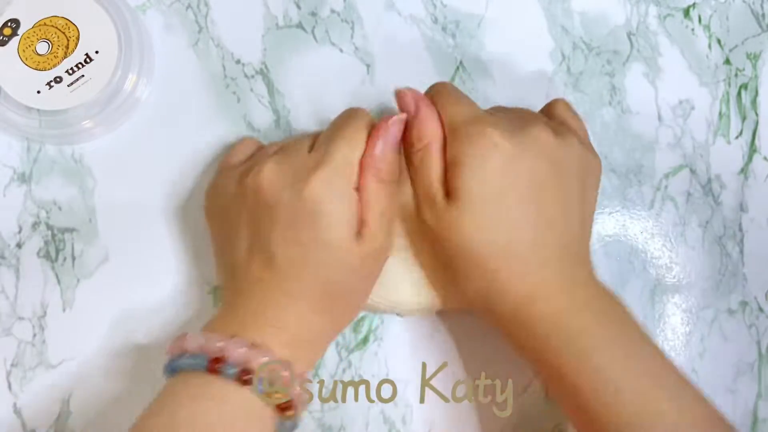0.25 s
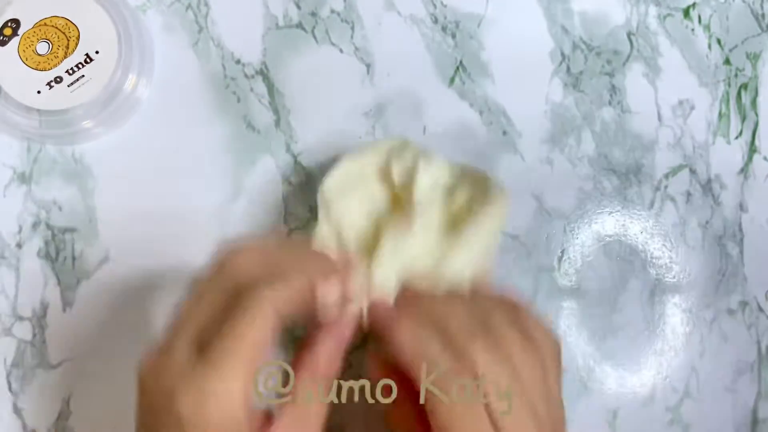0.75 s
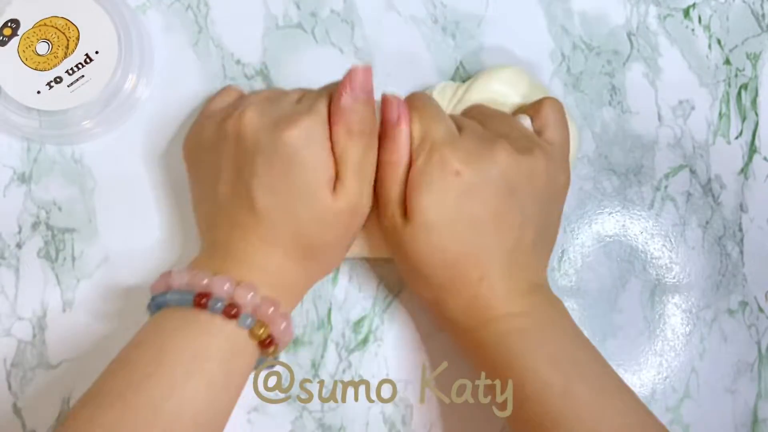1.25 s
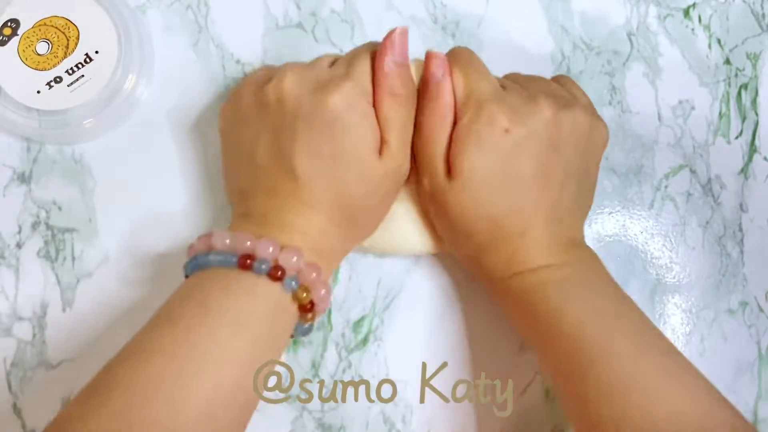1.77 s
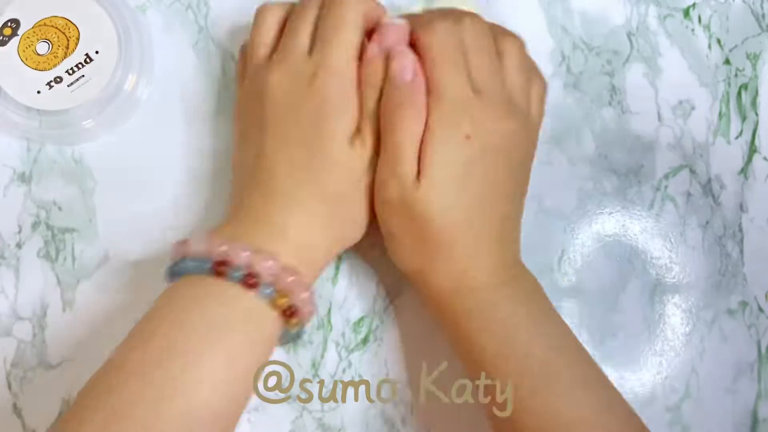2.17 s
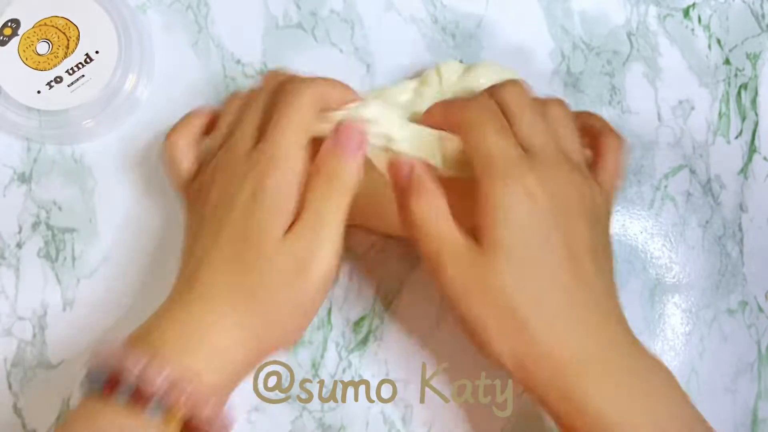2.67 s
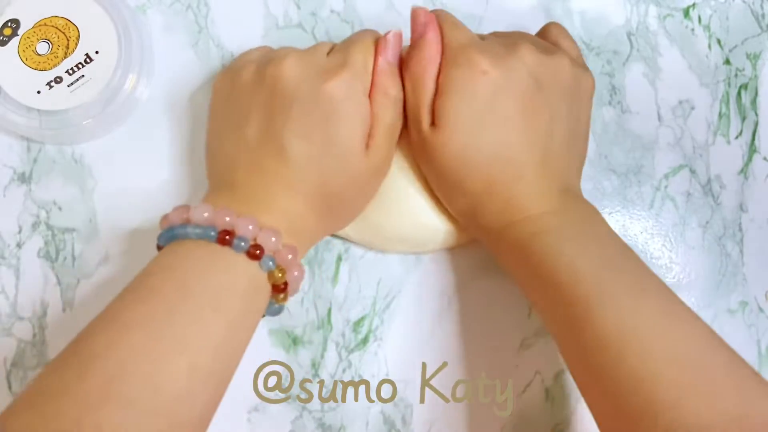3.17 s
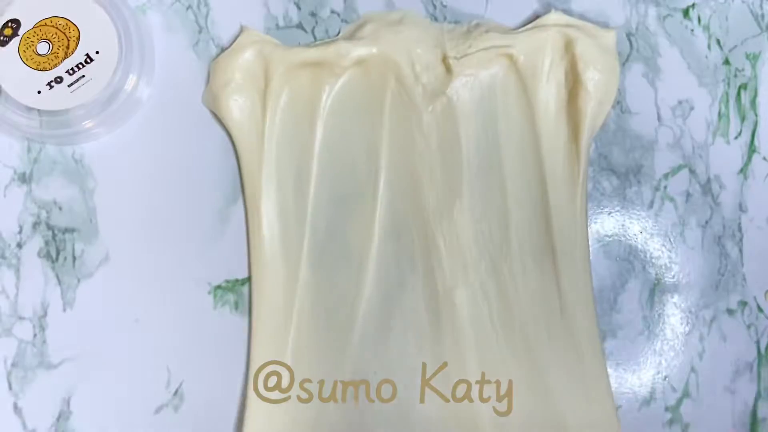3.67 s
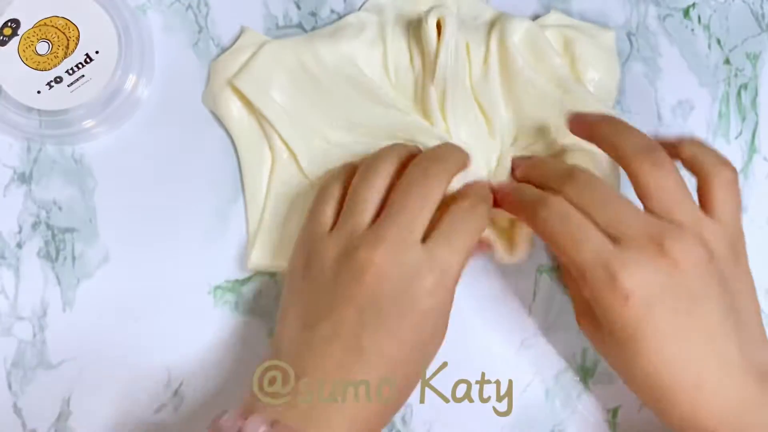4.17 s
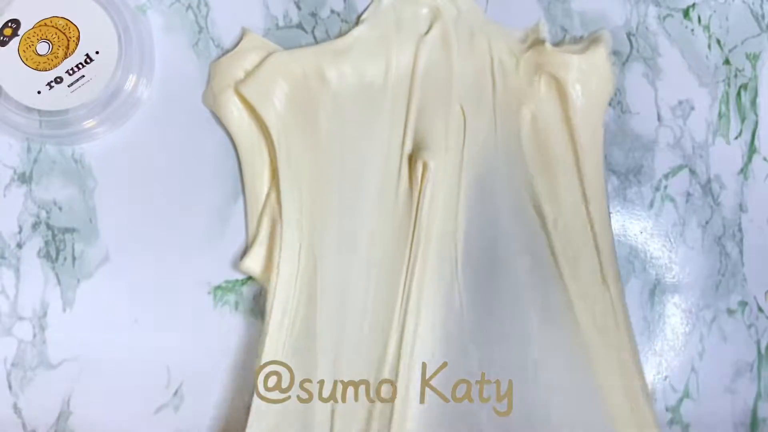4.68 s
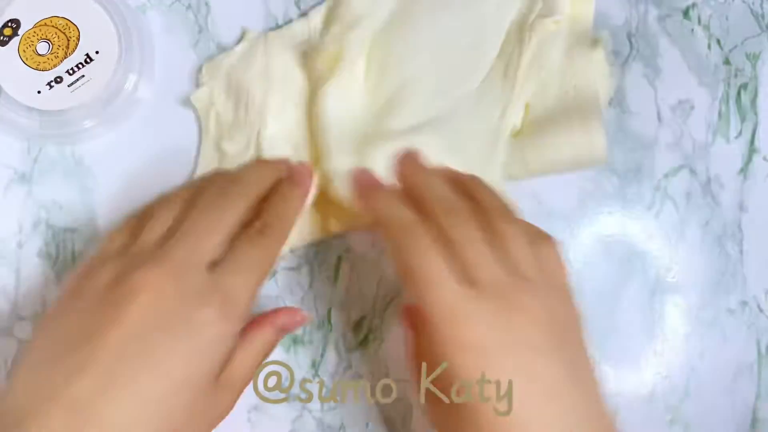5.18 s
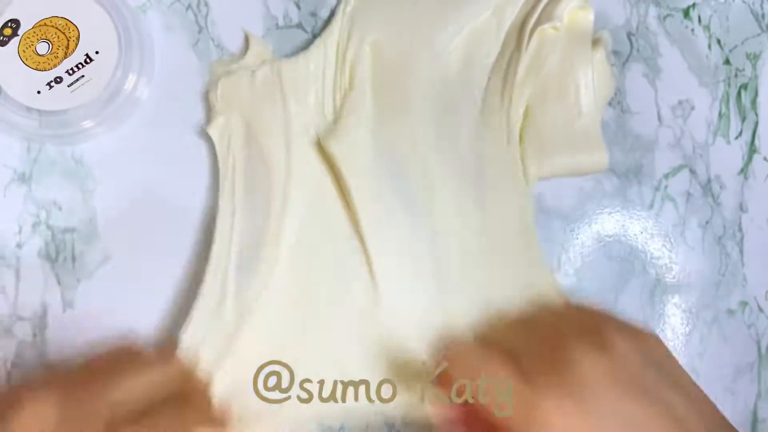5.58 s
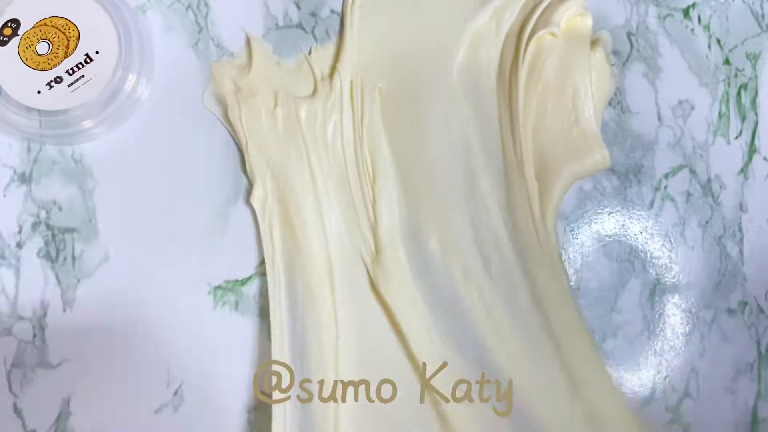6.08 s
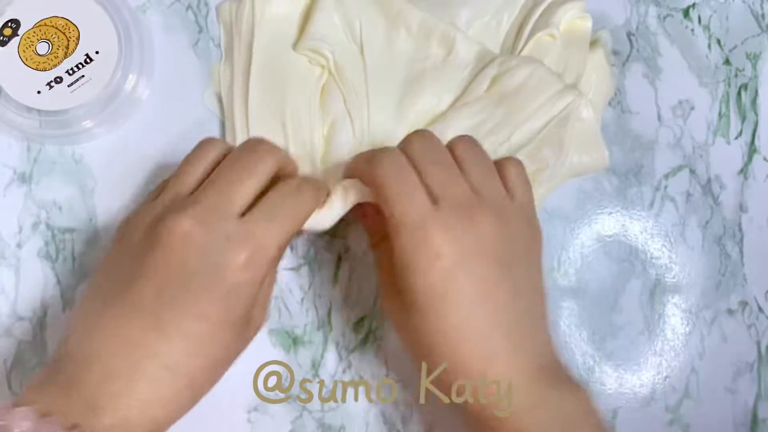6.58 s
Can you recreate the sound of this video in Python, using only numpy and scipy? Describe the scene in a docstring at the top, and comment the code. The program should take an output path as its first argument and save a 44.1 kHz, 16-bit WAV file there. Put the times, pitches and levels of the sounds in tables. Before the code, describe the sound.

Two hands knead sticky slime on a table, close to the microphone in a small, quiet room. Trapped air bursts in ragged clusters of sharp pops, with dull thuds and a fine crackling hiss as the slime peels off skin and tabletop. About halfway through it gets quieter: the slime is stretched and folded, giving scattered crackles, faint squeaks and a few soft slaps over a low table rumble.

```python
"""A table in a small room, close under a pair of microphone ports: two hands knead, fold and
stretch sticky slime. Trapped air pockets burst in short ragged pops; lump and hands thud on the
table top and ring its modes. The slime peels off skin and table with a fine crackling hiss and
the stretched sheet squeaks faintly, over table rumble, deep sway and room tone."""
import sys
import numpy as np
from scipy import signal
from scipy.fft import rfft, irfft
from scipy.io import wavfile
from scipy.ndimage import uniform_filter1d

SR = 44100
rng = np.random.default_rng(int(sys.argv[2]) if len(sys.argv) > 2 else 0)


def digitize_waveform(pressure):
    """Quantize a signal to 16-bit integers and store it at the path in sys.argv[1].

    Rows of a 2-D input are taken as channels; values are limited to [-1, 1].
    """
    field = np.atleast_2d(pressure).T
    bounded = np.clip(field, -1, 1)
    quanta = np.round(bounded * 32767).astype(np.int16)
    wavfile.write(sys.argv[1], SR, quanta)


N = 301644


def from_db(db):
    """Level to gain."""
    return 10 ** (np.asarray(db) / 20)


def unit_rms(x):
    """Scale to rms 1."""
    return x / np.sqrt(np.mean(x ** 2) + 1e-20)


def butter(x, order, hz, kind="band"):
    """Butterworth filter."""
    return signal.sosfilt(signal.butter(order, hz, kind, fs=SR, output="sos"), x)


def in_time(rows):
    """Columns of a curve table, one value per sample."""
    times, *columns = np.transpose(rows)
    return [np.interp(np.arange(N) / SR, times, column) for column in columns]


def at_hz(spectrum, hz):
    """Read a spectrum table on a log-frequency axis."""
    table_hz, values = np.transpose(spectrum)
    return np.interp(np.log(hz), np.log(table_hz), values)


def drift(rate_hz):
    """Slow random curve, rms 1."""
    pole = np.exp(-80 * np.pi * rate_hz / SR)  # runs at SR / 40
    slow = signal.lfilter([1], [1, -2 * pole, pole * pole], rng.standard_normal(N // 40 + 2002))[2000:]
    return np.interp(np.arange(N) / 40, np.arange(len(slow)), unit_rms(slow))


def add(out, sound, s):
    """Mix a sound in at s seconds."""
    i = round(s * SR)
    out[..., i:i + sound.shape[-1]] += sound[..., :N - i]


# Left-right likeness of noise: f/Hz, correlation
COHERENCE = [(30, 1), (100, 0.9), (400, 0.72), (1000, 0.95), (4000, 0.047), (8000, 1), (16000, 1)]


def coloured(source, spectrum):
    """Mid and side source to left and right with the given spectrum, rms 1."""
    hz = np.maximum(np.fft.rfftfreq(N, 1 / SR), 1)
    alike = np.clip(at_hz(COHERENCE, hz), 0, 1)
    mid, side = rfft(source) * from_db(at_hz(spectrum, hz))
    return unit_rms(irfft(np.sqrt(1 + alike) * mid + np.sqrt(1 - alike) * side * [[1], [-1]], N))


# Room tone: f/Hz, density/dB
AIR_SPECTRUM = [(30, 4.5), (60, 11.5), (120, 6), (500, -13), (2000, -12), (7000, -20.5), (16000, -25.5)]


def room_tone(level_db=-75.5):
    """Steady, bass-heavy noise."""
    return from_db(level_db) * coloured(rng.standard_normal((2, N)), AIR_SPECTRUM)


# Colour of the reverberant tail: f/Hz, density/dB
TAIL_SPECTRUM = [(100, -4.5), (300, 1), (1000, -8.5), (4000, -2), (16000, -17)]
# Reflections off table top and near surfaces: delay/ms, level/dB
REFLECTIONS = [(1.9, -14.5), (4.0, -21)]


def room(x, tail_db=-19, t60_s=0.2, treble_t60_s=0.12, treble_hz=5600):
    """Near reflections, then a dense stereo tail whose treble dies first."""
    t, length = np.arange(N) / SR, SR // 2
    envelope = from_db(-60 * t / t60_s) * (1 - np.exp(-t / 0.0045))
    tail = coloured(rng.standard_normal((2, N)) * envelope, TAIL_SPECTRUM)[:, :length]
    low = butter(tail, 2, treble_hz, "low")
    tail = low + (tail - low) * from_db(60 * t[:length] * (1 / t60_s - 1 / treble_t60_s))
    response = from_db(tail_db) * tail / np.sqrt(np.sum(tail ** 2) / 2)
    response[:, 0] += 1
    for ms, db in REFLECTIONS:
        response[:, round(ms * SR / 1000)] += from_db(db)
    return signal.fftconvolve(x, response, axes=1)[:, :N]


# Deep bass of the swaying table: t/s, level/dB
SWAY_LEVEL = [(0.0, -76.5), (0.59, -74), (0.89, -69.5), (4.27, -71.5), (4.74, -76), (5.39, -70.5),
              (5.7, -75.5), (6.17, -69), (6.84, -85.5)]


def table_sway(band_hz=(39.5, 110), lumpy_db=3.5):
    """The table sways as arms lean and pull: deep, lumpy bass."""
    level_db = in_time(SWAY_LEVEL)[0] + lumpy_db * drift(rate_hz=6.7)
    return from_db(level_db) * unit_rms(butter(rng.standard_normal(N), 2, band_hz))


# Slime settling between moves: t/s, hiss/dB, rumble/dB
REST_LEVELS = [(0, -94, -47), (.4, -73, -59), (.47, -80, -70.5), (.53, -73.5, -66.5), (.8, -69, -64.5),
               (1.45, -66.5, -74.5), (2.1, -76, -68), (2.21, -74, -79), (2.23, -63.5, -60.5),
               (2.55, -76, -66.5), (2.76, -80, -65), (3.1, -67, -60.5), (3.6, -77.5, -69),
               (4.2, -68.5, -68), (4.6, -71.5, -71.5), (4.83, -75, -72), (5.1, -69, -67),
               (5.35, -71.5, -71.5), (5.75, -72.5, -73), (5.85, -73, -73), (5.95, -76.5, -70.5),
               (6.05, -68.5, -68), (6.84, -72.5, -71)]
# Slow pushes and pulls: peak/s, release/s, hiss/dB, treble re hiss/dB, rumble/dB
SLOW_STROKES = [(0.315, 0.383, -48, 1.5, -43.5), (1.374, 1.424, -48.5, 7, -44.5),
                (2.014, 2.118, -49, 5, -47), (2.663, 2.73, -56.5, -4, -50), (2.667, 2.73, -49, 3, -47),
                (2.724, 2.729, -53.5, -7, -46), (3.318, 3.418, -51.5, 6, -44.5),
                (3.485, 3.509, -66.5, -11.5, -74.5), (3.803, 3.93, -66.5, 7, -61.5),
                (4.53, 4.705, -75.5, -3, -68), (4.986, 5.137, -63, 8, -66.5),
                (5.479, 5.703, -57.5, -1, -60), (6.195, 6.337, -63.5, -15, -61.5),
                (6.64, 6.796, -55.5, -5, -63)]
# Sudden peels: t/s, hold/s, hiss/dB, treble re hiss/dB, rumble/dB
SUDDEN_PEELS = [(0, 0.1, -41.5, 5, -55), (0.56, 0.098, -59.5, 7, -57), (0.879, 0.025, -58, -13, -62),
                (1.027, 0.08, -44, 5, -47.5), (1.576, 0.11, -58, -12, -53), (1.799, 0.0057, -48.5, 20, -65),
                (2.296, 0.011, -49.5, -0.5, -50), (2.369, 0.011, -51, 16.5, -56),
                (2.773, 0.011, -60.5, -23, -59), (2.833, 0.0089, -53.5, -10.5, -52),
                (2.954, 0.022, -57, -5, -51.5), (3.03, 0.017, -51.5, -4, -53), (3.111, 0.011, -56, -9, -53),
                (3.969, 0.0093, -52, -22.5, -53), (4.251, 0.043, -67, 13.5, -69.5),
                (4.358, 0.024, -84, -0.5, -71), (5.173, 0.031, -51, -23.5, -53),
                (5.236, .01, -61.5, -11.5, -69), (6.359, 0.0064, -50.5, -23, -55.5),
                (6.455, 0.0053, -55, -17, -58)]
BUILD_DB_PER_S, EASE_DB_PER_S, RELEASE_DB_PER_S = 132, 159.5, 1800
ONSET_DB_PER_S, FADE_DB_PER_S = 603.5, 201.5


def handling_levels(rest_treble_db=-5):
    """Hiss, treble and rumble in dB: each stroke and peel adds its power to the rest level."""
    t = np.arange(N) / SR
    rest_db, rest_rumble_db = in_time(REST_LEVELS)
    power = from_db([rest_db, rest_db + rest_treble_db, rest_rumble_db]) ** 2
    moves = []
    for peak_s, release_s, *levels in SLOW_STROKES:
        shape_db = np.minimum(BUILD_DB_PER_S * (t - peak_s), EASE_DB_PER_S * (peak_s - t))
        moves.append((shape_db - RELEASE_DB_PER_S * np.maximum(t - release_s, 0), *levels))
    for s, hold_s, *levels in SUDDEN_PEELS:
        shape_db = np.minimum(ONSET_DB_PER_S * (t - s), FADE_DB_PER_S * (s + hold_s - t))
        moves.append((np.minimum(0, shape_db), *levels))
    for shape_db, hiss_db, tilt_db, rumble_db in moves:
        power += from_db([[hiss_db], [hiss_db + tilt_db], [rumble_db]]) ** 2 * 10 ** (shape_db / 10)
    return 10 * np.log10(power)


# Table-top modes, also rung by thuds: f/Hz, level/dB, T60/s
TABLE_MODES = [(93, -17.5, 0.21), (147, -9, 0.24), (160, -6, .1), (283, -15.5, 0.096), (475, -10, 0.042),
               (550, -21.5, 0.19)]
# Handling noise in the table: f/Hz, density/dB
RUMBLE_SPECTRUM = [(30, -21), (60, -7.5), (90, -1), (150, -9.5), (300, 1.5), (500, -2.5), (800, -17)]


def table_rumble(level_db, ring_db=11.5, bandwidth_hz=9.7):
    """The peeling motion rumbles in the table; its modes stand out of the noise."""
    drive = rng.standard_normal((2, N)) * from_db(3.6 * drift(rate_hz=14))
    rumble = coloured(drive, RUMBLE_SPECTRUM)
    for hz, db, _ in TABLE_MODES:
        ring = signal.lfilter(*signal.iirpeak(hz, hz / bandwidth_hz, SR), rumble)
        rumble = rumble + from_db(db + ring_db) * ring
    return from_db(level_db) * unit_rms(rumble)


def flicker(x, depth_db=3, rate_hz=21):
    """Each sixth of an octave, 0.5-16 kHz, swells and fades by itself; rms 1."""
    edges_hz = 500 * 2 ** np.arange(0, 5.1, 1 / 6)
    bands = (butter(x, 2, band_hz) * (-1) ** k for k, band_hz in enumerate(zip(edges_hz, edges_hz[1:])))
    return unit_rms(sum(band * from_db(depth_db * drift(rate_hz)) for band in bands))


# Peeling hiss: f/Hz, density/dB
HISS_SPECTRUM = [(500, -1), (1100, 1), (2000, -1.5), (4000, -6.5), (7000, -10), (11000, -13.5),
                 (16000, -29.5)]


def peeling(hiss_db, treble_db, snaps_per_s=1600, spread_db=3.5, clump_db=2.5, treble_hz=6000):
    """Countless tiny threads snap, in clumps, over a smooth rub."""
    sizes = from_db(spread_db * np.minimum(rng.exponential(1, N), 5))
    snapping = rng.random(N) < snaps_per_s / SR
    snaps = unit_rms(sizes * snapping) * rng.standard_normal((2, N))
    rub = 0.85 * rng.standard_normal((2, N))
    clumps = from_db(clump_db * drift(rate_hz=22))
    hiss = flicker(coloured((snaps + rub) * clumps, HISS_SPECTRUM))
    low = butter(hiss, 1, treble_hz, "low")
    return from_db(hiss_db) * low + from_db(treble_db) * (hiss - low)


# Squeaks of the stretched sheet: t/s, level/dB, f/Hz, length/ms
SHEET_SQUEAKS = [(2.16, -65, 1384, 35), (3.266, -61, 3050, 41), (3.265, -56.5, 2070, 48),
                 (3.28, -55, 882, 44), (3.325, -50.5, 1153, 35), (3.4, -64, 1114, 75),
                 (3.47, -69, 1937, 50), (3.55, -73, 1696, 71), (4.18, -65, 3260, 70),
                 (4.565, -66, 1420, 25), (4.67, -69, 1400, 18.5), (4.732, -69.5, 1382, 26),
                 (4.84, -71, 3150, 78), (4.865, -69.5, 1343, 20), (4.88, -69, 2710, 38),
                 (5.012, -64.5, 704, 22), (5.16, -43.5, 857, 13), (5.164, -50, 2670, 11),
                 (5.2, -54, 1070, 22), (5.405, -65.5, 900, 15), (5.502, -63, 1460, 35),
                 (5.555, -62.5, 1176, 47), (5.634, -66.5, 2970, 23), (5.639, -65.5, 1300, 32),
                 (5.642, -66, 3930, 42), (5.86, -74.5, 1690, 30), (5.886, -73.5, 1390, 19),
                 (5.989, -60.5, 1358, 35), (6.049, -63, 1334, 31), (6.054, -69, 1994, 31),
                 (6.15, -66.5, 3800, 28), (6.17, -62, 1905, 43), (6.2, -70, 3720, 28),
                 (6.211, -67.5, 3030, 48), (6.475, -61, 1000, 41), (6.5, -63, 2400, 32),
                 (6.536, -69, 2700, 27), (6.667, -59, 2210, 10), (6.794, -69.5, 3590, 35)]


def squeaks(hiss_db, waver=0.022, rough_db=5, stray_db=-5, stray_count=450):
    """The sheet squeaks in short, rough, wavering tones; faint random ones follow the hiss level."""
    out, strays = np.zeros(N), []
    for when, softness, pitch, length in rng.random((stray_count, 4)):
        s = 6.7 * when
        db = hiss_db[round(s * SR):][:2000].min() + stray_db - 8 * softness
        strays.append((s, db, 900 * 3.8 ** pitch, 15 + 60 * length))
    for s, db, hz, ms in SHEET_SQUEAKS + strays:
        n = round(ms * SR / 1000)
        wobble = unit_rms(uniform_filter1d(rng.standard_normal(6000), 90)[:n])
        grit = unit_rms(uniform_filter1d(rng.standard_normal(6000), 60)[:n])
        tone = np.sin(2 * np.pi * np.cumsum(hz * (1 + waver * wobble)) / SR)
        add(out, from_db(db + rough_db * grit) * np.hanning(n) ** 0.88 * tone, s)
    return out


# A hand presses or lands on the table: t/s, level/dB, final f/Hz
HAND_THUDS = [(0.01, -34, 473), (0.031, -24, 480), (0.041, -34, 270), (0.095, -23, 465), (.104, -34.5, 284),
              (0.158, -36.5, 318), (0.324, -36.5, 370), (0.771, -57, 152), (.901, -48, 383),
              (1.011, -30.5, 456), (1.02, -38, 285), (1.031, -38, 249), (1.039, -33.5, 740),
              (1.05, -44, 504), (1.068, -48, 467), (1.104, -34.5, 462.6), (1.129, -35.5, 430),
              (1.138, -46, 490), (1.15, -47, 282), (1.371, -44.5, 89.5), (1.526, -29.5, 296),
              (1.652, -34, 482), (1.707, -42, 513), (1.791, -31, 286), (1.792, -32, 620), (1.794, -51, 156),
              (1.944, -51.5, 305), (2.02, -48, 93), (2.048, -47.5, 520), (2.24, -57.5, 150),
              (2.284, -39.5, 425), (2.298, -32.5, 292), (2.342, -30.5, 403), (2.355, -29, 520),
              (2.367, -24.5, 445), (2.41, -36.5, 480), (2.442, -47, 382), (2.669, -38.5, 350),
              (2.837, -23.5, 300), (3.037, -44.5, 450), (3.119, -34, 311), (3.297, -40.5, 268),
              (3.341, -36, 280), (3.721, -58.5, 139.3), (3.979, -55, 152), (4.142, -52.5, 150),
              (4.283, -57, 158), (4.349, -61, 60.8), (4.429, -56, 60), (4.445, -62.5, 98.6),
              (5.172, -51, 157), (5.446, -47, 147), (5.49, -49, 121.6), (6.351, -47, 248),
              (6.383, -45.5, 97), (6.433, -49, 92), (6.51, -60.5, 150), (6.583, -61, 295),
              (6.621, -57.5, 156), (6.691, -71, 88.8)]
# The folded sheet lands: t/s, level/dB
SHEET_SLAPS = [(4.049, -30.5), (5.2501, -28.5), (6.379, -41.5), (6.455, -38.5)]
THUD_SHAPE, SLAP_SHAPE = (1.273, 0.88), (1.76, 1.15)  # start f / final f, swell/cycles
SLAP_HZ = 155.7
SMACK_HZ, SMACK_DB, SMACK_LEAD_S = 356, -3, 0.0039  # the wet face smacks just ahead of each slap


def thuds(sag_s=0.0029, reach_octaves=0.57):
    """A soft blow swells and dies in a few cycles, high waves first; nearby table modes ring on."""
    out, t = np.zeros(N), np.arange(9000) / SR
    mode_hz, mode_db, t60_s = np.transpose(TABLE_MODES)[:, :, None]
    blows = [(s, db, hz, THUD_SHAPE) for s, db, hz in HAND_THUDS]
    blows += [(s, db, SLAP_HZ, SLAP_SHAPE) for s, db in SHEET_SLAPS]
    blows += [(s - SMACK_LEAD_S, db + SMACK_DB, SMACK_HZ, THUD_SHAPE) for s, db in SHEET_SLAPS]
    for s, db, hz, (start_ratio, cycles) in blows:
        swell_s = cycles / hz
        pitch_hz = hz * (1 + (start_ratio - 1) * np.exp(-t / sag_s))
        blow = t / swell_s * np.exp(1 - t / swell_s) * np.sin(2 * np.pi * np.cumsum(pitch_hz) / SR)
        coupling = np.exp(-0.5 * (np.log2(mode_hz / hz) / reach_octaves) ** 2)
        decay = from_db(mode_db + 2 * rng.standard_normal(mode_hz.shape) - 60 * t / t60_s)
        ring = np.sum(coupling * decay * np.sin(2 * np.pi * mode_hz * t), axis=0)
        add(out, from_db(db) * (blow + ring * (1 - np.exp(-t / swell_s))), s)
    return out


def tear_envelope(t, ms, snap_s=0.0003, shrink_db=-28, shrink_t60_s=0.2):
    """A film snaps (less in long tears), rips, stops short, then crackles faintly as it shrinks back."""
    progress = 1000 * t / ms
    snap = from_db(-4.5 - ms) * t / snap_s * np.exp(1 - t / snap_s)
    rip = (1 - np.exp(-progress / 0.6)) * np.exp(-(0.6 * progress) ** 2)
    shrink = np.sqrt(ms) * (1 - np.exp(-t / 0.0026)) * from_db(shrink_db - 60 * t / shrink_t60_s)
    return snap + rip + shrink


# Bursting air pockets: t/s, pocket/dB, pocket f/Hz, film/dB, wall slap/dB, tear/ms
AIR_POCKETS = [(0.0112, -11, 5500, -23, -46, 1.5), (0.0265, -19, 6030, -26, -30, 4.3),
               (0.0305, -6.5, 6100, -21, -13.5, 2.4), (0.0477, -17, 5670, -11.5, -49, 3),
               (0.0576, -0.5, 8000, -25, -43, 1.4), (0.075, -6, 6550, -9, -42, 0.9),
               (0.084, -11.5, 5430, -16, -49, 2.5), (0.096, -9, 3000, -2, -23, 1.2),
               (.1073, -22, 3780, -34, -36, 1.6), (0.121, -28, 4500, -43, -33, 1.8),
               (0.154, -65, 3380, -33, -33, 2.3), (0.272, -32, 6500, -43.5, -50, 1.2),
               (0.286, -38, 4020, -57, -37, 1.1), (.56, -48, 5040, -52, -41.5, 0.8),
               (0.5842, -36.5, 3870, -61, -43, 0.81), (.614, -41, 4000, -57, -60, 2.5),
               (0.638, -32, 3400, -37, -62, 0.51), (0.703, -41.5, 3200, -54, -58, 1.3),
               (0.9002, -23, 3170, -32, -37, 1.9), (.948, -45, 5500, -46, -49, 1.5),
               (.988, -53, 2500, -48, -38, 1.2), (.999, -36, 2400, -57, -40, 1),
               (1.0088, -11.5, 2740, -56, -20.5, 2.5), (1.023, -16, 4400, -55, -20, 1.4),
               (1.046, -30, 3860, -38, -19, 1.1), (1.051, -11.5, 7200, -44, -37, 2.6),
               (1.067, -11.5, 6550, -22, -40, 1.6), (1.075, -16, 6600, -32, -46, 1.7),
               (1.094, -30, 4000, -40, -21, 1.5), (1.1016, -0.5, 4524, -39.5, -34, 0.94),
               (1.112, -30, 3000, -38.5, -21.5, 1.5), (1.125, -25, 4440, -18, -22, 2.3),
               (1.132, -15.5, 4260, -32, -35.5, 1.3), (1.4902, -63, 2040, -52, -28, 1.1),
               (1.5217, -26, 2190, -58, -20.5, 2), (1.6182, -33, 2850, -58, -44, 1),
               (1.6241, -26, 5660, -57, -52, 1.7), (1.632, -50, 2200, -59, -23.5, 1.1),
               (1.6537, -1.5, 8060, -11.5, -17.5, 2), (1.679, -27, 3520, -40.5, -44, 1),
               (1.6858, -24, 4050, -20, -31, 2.3), (1.706, -1.5, 6800, -5.5, -12.5, 1.66),
               (1.756, -25.5, 3000, -31, -29, 1.6), (1.786, -8, 2660, -32, -11, 6.5),
               (1.7886, 3.5, 2320, -10, -20, 1.76), (1.7974, -12.5, 3600, -7.5, -23, 2.8),
               (1.817, -31, 3200, -32, -25, 2.5), (1.843, -33, 4500, -47, -32, 1.8),
               (2.2365, -36.5, 5800, -48.5, -49.5, 0.89), (2.2496, -35, 6000, -31, -54.5, 1.8),
               (2.268, -47, 6600, -44.5, -56, 0.81), (2.2822, -17.5, 5800, -32, -57, 0.45),
               (2.2927, -22.5, 3920, -36, -49, 2.6), (2.317, -34, 4000, -48, -56, 2),
               (2.332, -42, 7000, -31, -57, 1.8), (2.341, -15, 6800, -13, -28, 1.5),
               (2.3545, -10.5, 4550, -18, -42, 2.8), (2.366, -10, 4330, -9, -33, 4.1),
               (2.381, -15, 4600, -27, -39, 2.5), (2.439, -21, 5560, -27, -38, 0.42),
               (2.46, -34, 4180, -25, -35, 1.3), (2.506, -33.5, 4750, -57, -76, 0.4),
               (2.523, -34, 4440, -62, -72, 1.6), (2.67, -27, 4500, -43, -59, 0.84),
               (2.775, -60, 6500, -56, -63, 1), (2.8, -41, 3000, -59, -42.5, 2.5),
               (2.8329, -15.5, 2920, -60, -23, 2), (2.8874, -14.5, 7300, -29, -63.5, 0.39),
               (2.927, -46, 2500, -60, -46, 1), (2.9483, -19.5, 6750, -16.5, -56, 1.5),
               (2.981, -33.5, 3500, -47, -35.5, 0.73), (3.002, -45, 4500, -52, -47, 0.78),
               (3.012, -44, 5500, -57, -55, 1.1), (3.027, -23.5, 3860, -54, -51, 0.57),
               (3.0366, -14, 2870, -6.5, -15, 2.1), (3.063, -32, 5500, -40, -51, 3),
               (3.1183, -22, 2370, -34, -29, 2.2), (3.221, -53, 1800, -58, -39, 1.5),
               (3.541, -55.5, 5050, -62.5, -54, 1.4), (3.675, -50, 5000, -40.5, -61, 1.7),
               (3.7176, -60.5, 1995, -72, -34.5, 0.93), (3.854, -56.5, 4000, -53, -58, 0.81),
               (3.961, -25, 2100, -47, -29.5, 5.6), (3.989, -48, 2800, -60, -47, 1.3),
               (4.0042, -29, 2600, -57, -65, 2), (4.024, -46, 3000, -57, -44, 1.6),
               (4.0459, -25, 3250, -54, -25.5, 2.1), (4.138, -56, 7000, -61.5, -51.5, 6.9),
               (4.225, -57, 7200, -44, -56.5, 1.6), (4.2819, -31, 2700, -56, -42, 0.34),
               (4.293, -36, 2210, -64, -43, 1.8), (4.303, -46.5, 7000, -53, -44, 1.5),
               (4.4746, -47.5, 2680, -63, -56, 0.71), (4.533, -35.5, 3000, -53, -43, 0.54),
               (4.632, -56, 3570, -65, -65.5, 1.4), (4.7734, -60, 6500, -52, -57, 0.97),
               (4.782, -49.5, 2370, -62, -57.5, 1.45), (4.935, -44, 2185, -61, -48.5, 1.8),
               (4.949, -42, 2600, -60, -40, 2.4), (4.9574, -37, 2460, -63, -53, 2.5),
               (5.157, -42, 5980, -56, -44, 2), (5.1598, -54, 2170, -58, -23.5, 1.75),
               (5.174, -31, 2750, -51, -33, 1.1), (5.194, -39, 4000, -50, -35, 3.3),
               (5.2126, -66, 2600, -48, -31, 4.4), (5.222, -38, 2475, -57, -51, 1.2),
               (5.244, -47, 4190, -56, -40, 0.94), (5.2487, -35.5, 2920, -63, -70, 2.7),
               (5.075, -56, 4030, -50.5, -57.5, 1.2), (5.384, -43, 5060, -52, -63, 1.1),
               (5.4423, -45.5, 3850, -43, -43, 2.5), (6.139, -47, 2200, -60, -49, 2.8),
               (6.3542, -55, 2720, -51, -30, 0.93), (6.36, -35, 4000, -58, -29.5, 1.1),
               (6.375, -22.5, 3300, -41.5, -24, 2.9), (6.3759, -25.5, 4500, -45, -28, 1.1),
               (6.398, -41, 2200, -64, -26, 0.94), (6.4522, -42.5, 4000, -59, -41, 1.6),
               (6.584, -37, 2200, -37.5, -33, 2.5), (6.618, -37.5, 2940, -48, -57, 3)]
# Pocket position between the ports: t/s, L-R/dB
POCKET_PAN = [(0.0, 1.5), (0.91, -0.5), (1.1, 2.5), (1.16, -3.5), (1.43, 12.5), (1.49, -1), (1.6, 0.5),
              (1.81, -1), (2.02, 5.5), (2.19, 6.5), (2.23, 5.5), (2.27, -0.5), (3.43, 1), (3.98, 3.5),
              (4.0, 1), (4.86, 3), (5.18, 1), (5.72, 3.5), (6.02, -1), (6.4, 1), (6.59, 3), (6.63, 3),
              (6.69, 2.5), (6.84, 0.5)]
FILM_HZ, BODY_HZ, LUMP_HZ, SHEET_HZ = (8000, 14000), (120, 800), (1300, 2500), (750, 2200)
SHEET_FROM_S = 3.5  # kneaded lump before, stretched sheet after


def pops(hiss_db, small_count=60, ragged_db=6.5, ring_cycles=0.6, body_db=-11, width=0.3, scatter_db=2):
    """A bright film tears raggedly; the pocket resonates broadly, its walls slap, the lump thumps."""
    out, t = np.zeros((2, N)), np.arange(5600) / SR
    small_pockets = []
    for s, pitch, length, softness in rng.random((small_count, 4)) * [N / SR, 1, 1, 1]:
        db = hiss_db[int(s * SR)] + 4 - 8 * softness
        small_pockets.append((s, db, 2200 * 2.2 ** pitch, db - 12, db - 9, 1 + length))
    for s, pocket_db, hz, film_db, slap_db, ms in AIR_POCKETS + small_pockets:
        mid, side, jitter = rng.standard_normal((3, len(t)))
        ragged = from_db(ragged_db * np.repeat(np.clip(jitter[:len(t) // 8], -2, 1.8), 8))
        envelope = tear_envelope(t, ms)
        tear = (mid + width * side * [[1], [-1]]) * ragged * envelope
        pole = np.exp(-hz / ring_cycles / SR)
        pocket = signal.lfilter([1, 0, -1], [1, -2 * pole * np.cos(2 * np.pi * hz / SR), pole**2], tear)
        film = butter(tear, 2, FILM_HZ)
        body = butter(tear, 2, BODY_HZ)
        walls = butter(tear, 3, LUMP_HZ if s < SHEET_FROM_S else SHEET_HZ)
        parts = [(pocket_db, pocket), (film_db, film), (slap_db + body_db, body), (slap_db, walls)]
        energy = np.sum(envelope ** 2)
        pop = sum(from_db(db) * part * np.sqrt(energy / np.sum(part ** 2)) / 2 for db, part in parts)
        pan_db = np.interp(s, *np.transpose(POCKET_PAN)) + scatter_db * jitter[-1]
        add(out, pop * from_db([[pan_db / 2], [-pan_db / 2]]), s)
    return out


def scene():
    """Pops, thuds and squeaks in the room, over dry peeling, rumble, sway and room tone."""
    hiss_db, treble_db, rumble_db = handling_levels()
    air = room_tone()
    events = room(pops(hiss_db) + thuds() + squeaks(hiss_db))
    return events + peeling(hiss_db, treble_db) + table_rumble(rumble_db) + table_sway() + air


# Phase between the ports: f/Hz, left lead/rad
PORT_PHASE = [(0, 0), (600, .7), (1300, .9), (3000, 1.0), (4500, .3), (6850, 0), (16500, -14.1)]
# Balance between the ports: f/Hz, L-R/dB
PORT_BALANCE = [(125, 1), (300, -1.5), (1000, -2), (2000, 0), (4000, 2), (8000, 0.5), (16000, -1)]


def record(dry, low_cut_hz=35.2, stopband_hz=16900, ceiling=0.85):
    """The two ports differ in colour and phase; peaks are rounded, lowest bass and top are cut."""
    hz = np.fft.rfftfreq(N, 1 / SR)
    lead_rad = np.interp(hz, *np.transpose(PORT_PHASE))
    left_gain = from_db(at_hz(PORT_BALANCE, hz + 1) / 2)
    ported = irfft(rfft(dry) * np.array([left_gain * np.exp(1j * lead_rad), 1 / left_gain]), N)
    rounded = ceiling * np.tanh(butter(ported, 2, low_cut_hz, "high") / ceiling)
    return signal.sosfilt(signal.cheby2(14, 90, stopband_hz, fs=SR, output="sos"), rounded)


dry = scene()
out = record(dry)
digitize_waveform(out)
```